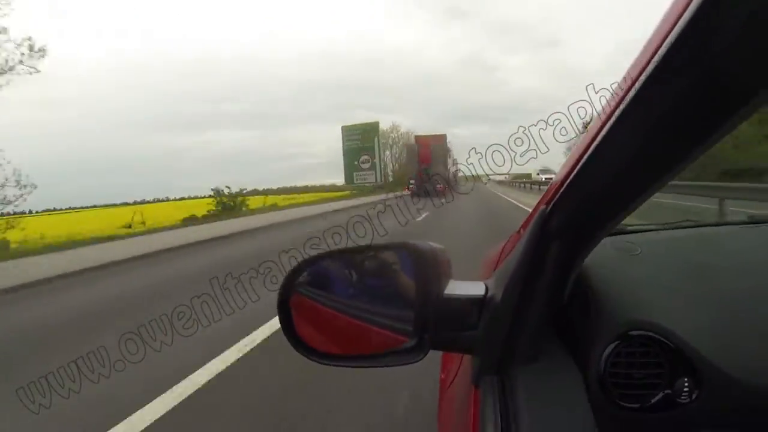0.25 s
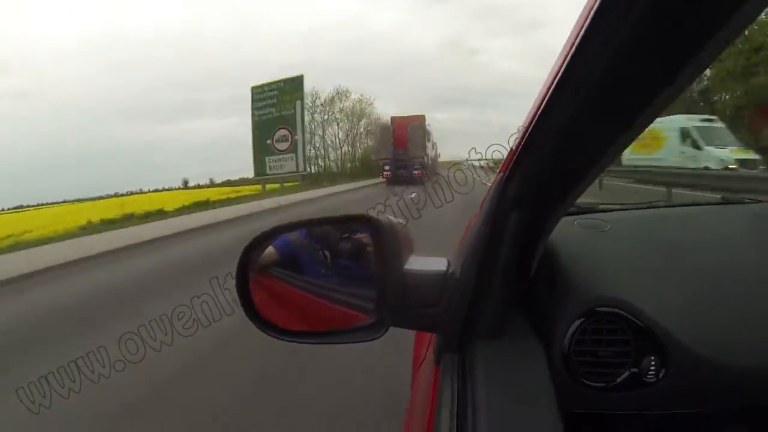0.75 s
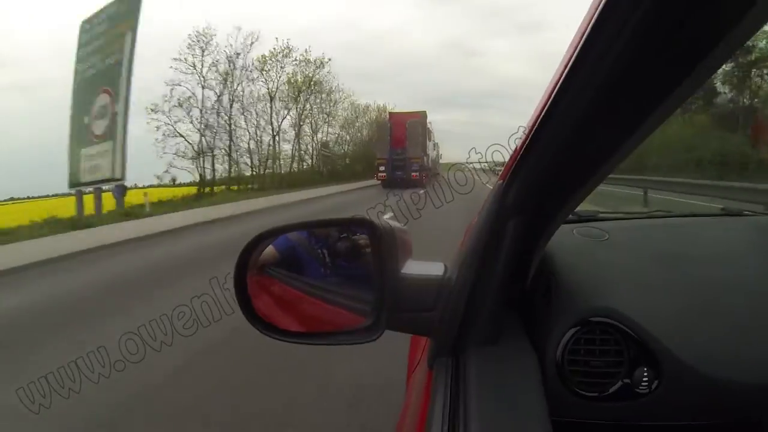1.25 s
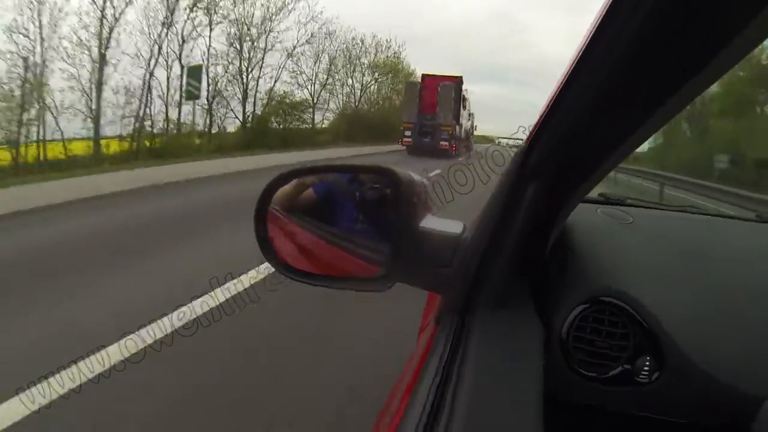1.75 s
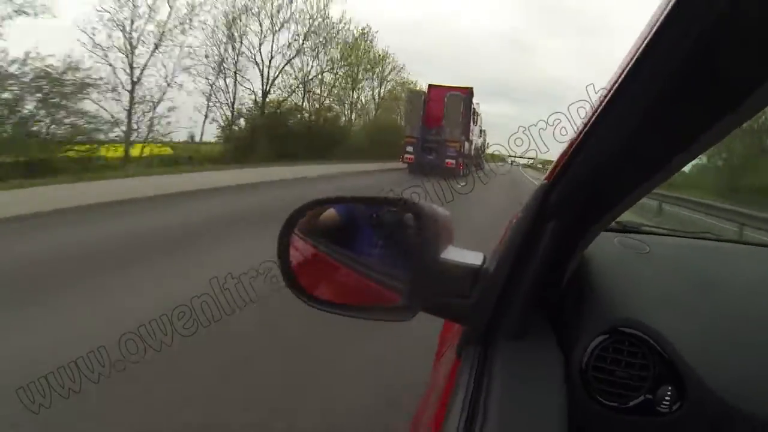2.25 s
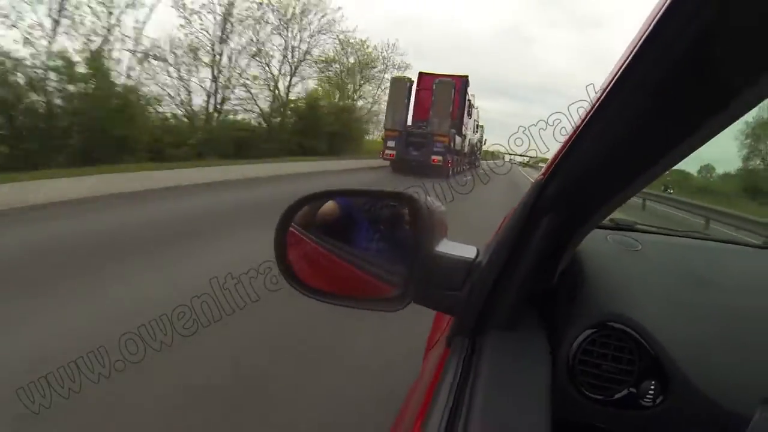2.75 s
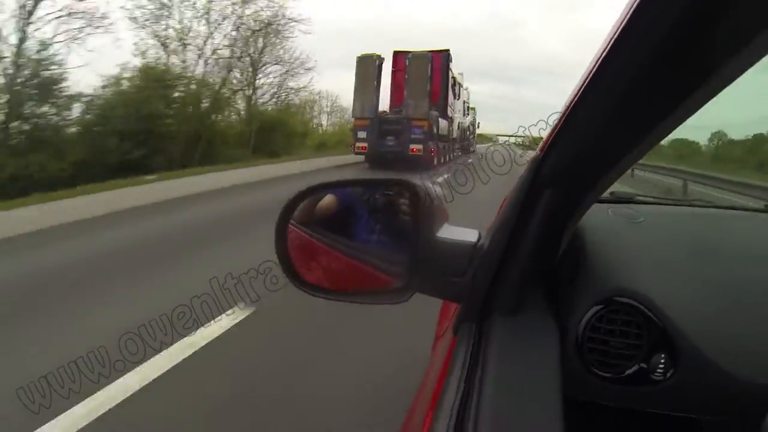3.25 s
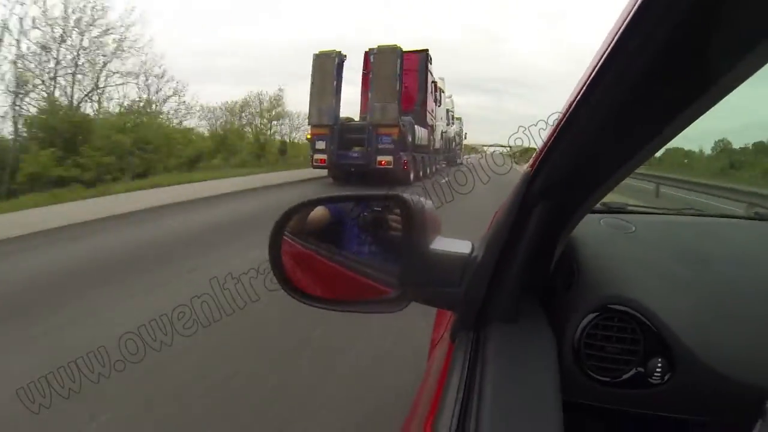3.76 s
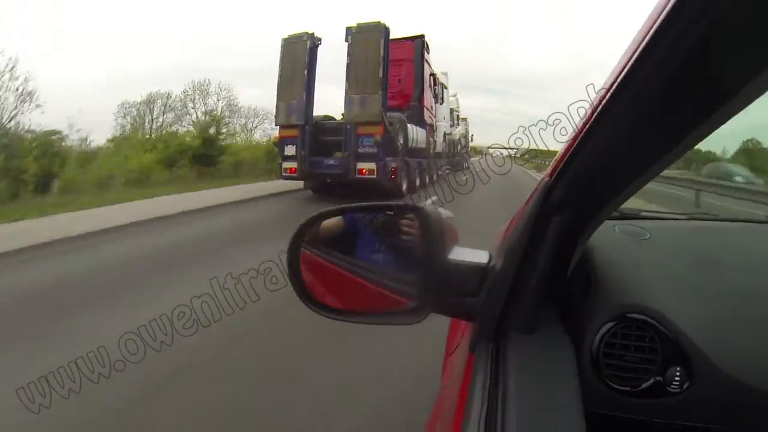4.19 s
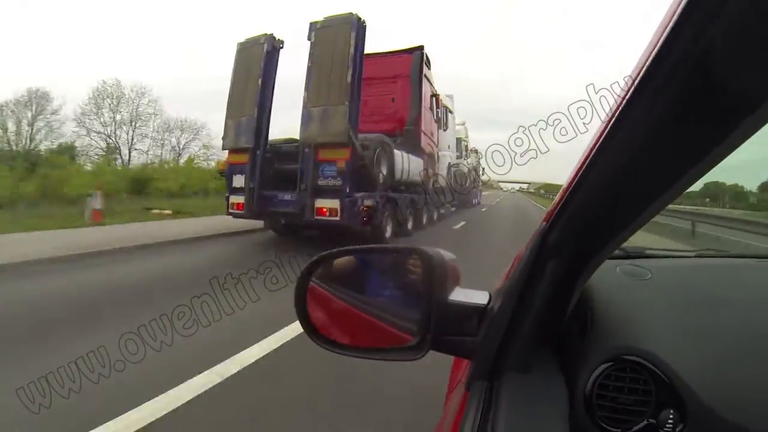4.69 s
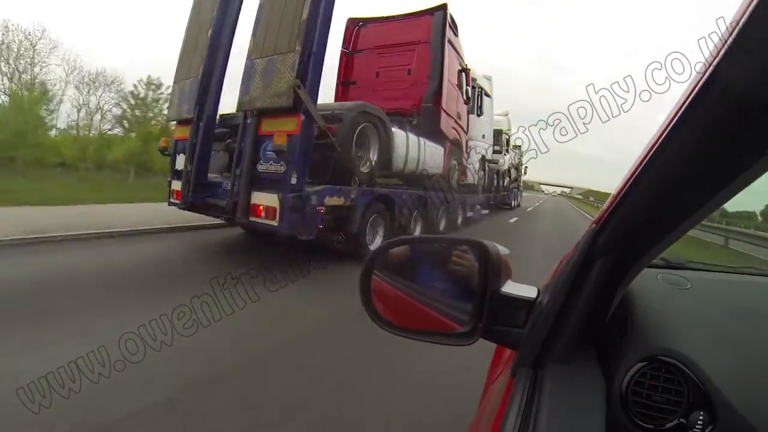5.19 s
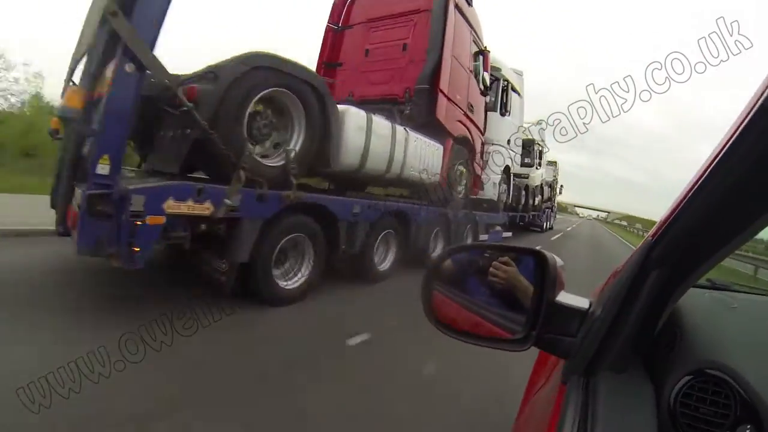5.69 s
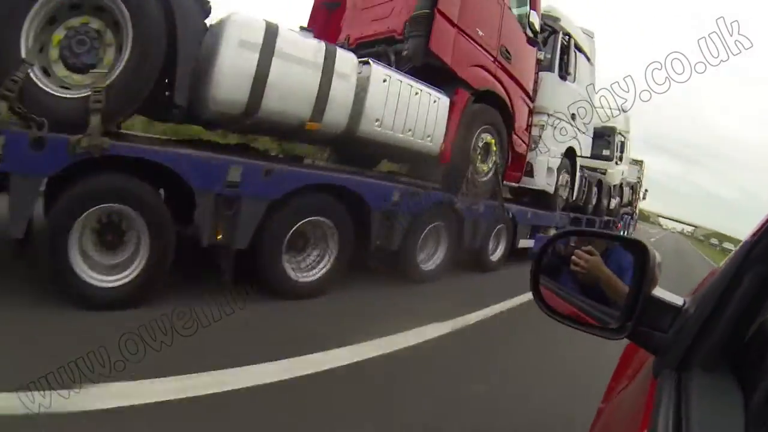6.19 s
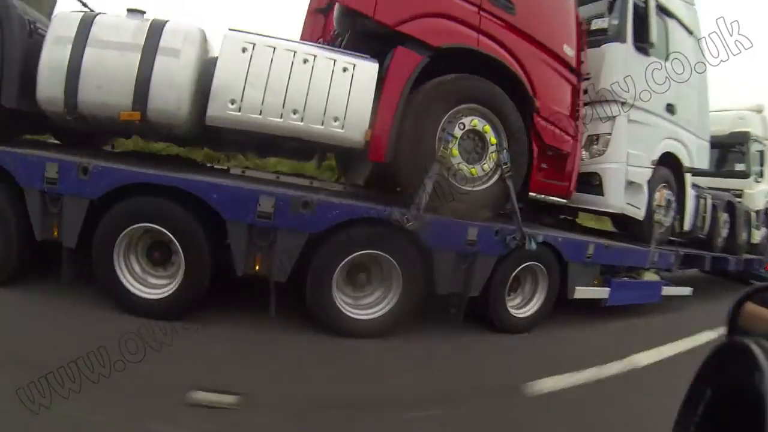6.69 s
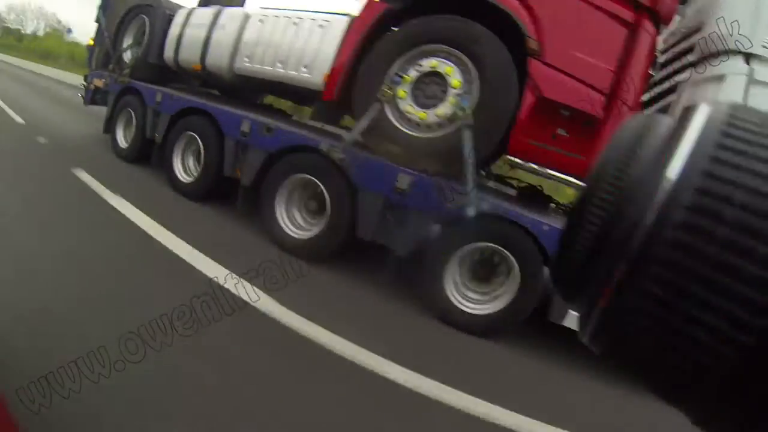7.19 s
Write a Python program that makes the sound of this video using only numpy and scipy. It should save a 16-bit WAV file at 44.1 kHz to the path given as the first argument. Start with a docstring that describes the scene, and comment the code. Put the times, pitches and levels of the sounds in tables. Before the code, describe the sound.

Wind noise dominates from the start: dull thumps, short ripping bursts and fluttering air overload a small microphone at a moving car's window. Steady road and tyre roar sits far below, dipping after strong gusts. Gusts come in uneven clusters, crowd together near the lorry's rear, then merge into a thick turbulent rush beside its wheels before it slackens slightly at the end.

```python
"""Heard: low lumpy rumble, ragged flutter, gusts that thump and tear, a surge beside a lorry, tyre roar below.
A small camera sits at the open window of a car on a fast road, passing the lorry.
Gusts, flutter and wake are shaped membrane flips; thumps are damped swings; rumble and tyres are shaped noise.
Rumble and tyres sink after each strong gust and climb back; the whole is limited and softly overloaded."""
import sys
import numpy as np
from scipy import signal
from scipy.fft import rfft, irfft
from scipy.io import wavfile
from scipy.ndimage import uniform_filter1d

SR = 44100
rng = np.random.default_rng(int(sys.argv[2]) if len(sys.argv) > 2 else 0)


def bounce(signal):
    """Save signal as a 16-bit WAV file at the path given by the first command-line argument."""
    frames = np.transpose(np.atleast_2d(signal))
    limited = np.clip(frames, -1, 1)
    pcm = np.round(limited * 32767).astype(np.int16)
    wavfile.write(sys.argv[1], SR, pcm)


N = 328104

# Gusts on the port. Each row: middle of the rise in seconds, tearing level in dB, thump level in dB,
# nominal length in seconds.
GUSTS = [(0.0097, -32, -28, 0.024), (0.041, -24.5, -16, 0.026), (0.073, -22.5, -31, 0.005),
         (0.108, -26, -9.5, 0.014), (0.168, -43, -16, 0.0053), (0.2264, -23, -6, 0.0086),
         (0.239, -22.5, -21.5, 0.018), (0.274, -30, -17, 0.025), (0.355, -57, -19, 0.02),
         (0.3817, -33.5, -10, 0.014), (0.408, -37, -16, .015), (0.443, -24, -1.5, 0.012),
         (0.462, -26, -14, .006), (0.476, -26, -6.5, 0.0075), (0.566, -62, -11, 0.012),
         (0.66, -56, -6, 0.0057), (0.705, -27, 0.5, 0.016), (0.7456, -38, -11, 0.008),
         (0.7617, -31.5, -14, 0.025), (0.794, -20, -0.5, 0.0095), (0.92, -33, -7, 0.015),
         (0.956, -29.5, -13.5, .009), (1.0535, -30.5, -3, 0.009), (1.089, -41.5, -14, 0.015),
         (1.165, -33.5, -18, 0.011), (1.197, -31, -35, 0.0098), (1.235, -32, -34, 0.012),
         (1.2602, -21, -24, 0.013), (1.3414, -38.5, -8.5, 0.0064), (1.36, -37.5, -20, 0.014),
         (1.463, -21.5, -1.5, 0.005), (1.5029, -28.5, -13, 0.0043), (1.715, -37, -2, 0.0064),
         (1.928, -37, -9, 0.011), (2.0457, -26.5, -10, 0.015), (2.1, -11.5, -3, 0.005),
         (2.1419, -28, -26, 0.015), (2.2122, -13, -9.5, .013), (2.232, -29, -13, 0.0074),
         (2.2572, -21.5, -22, 0.0051), (2.321, -31.5, -9, 0.0062), (2.3536, -25.5, -2.5, 0.0093),
         (2.3958, -30.5, -22, 0.0094), (2.537, -35, -2, 0.015), (2.572, -18.5, -12, 0.0026),
         (2.6918, -33.5, -4.5, 0.0073), (2.737, -21, -7.5, 0.012), (2.7643, -19, -26, 0.0048),
         (2.8036, -26.5, -40, .013), (2.8273, -24, -19, 0.005), (2.865, -25, -3, .012),
         (2.919, -44.5, -16, 0.014), (3.102, -40, -12.5, 0.0054), (3.154, -43, -12, 0.006),
         (3.162, -24.5, -8, 0.024), (3.255, -15.5, -9, 0.0057), (3.262, -38, -18.5, 0.033),
         (3.348, -29, -13.5, 0.011), (3.419, -34.5, -2.5, 0.015), (3.48, -24.5, -11.5, 0.011),
         (3.619, -40, -9.5, 0.01), (3.85, -33, -8.5, 0.0041), (3.953, -44.5, -5.5, 0.016),
         (3.977, -23, -18, .011), (4.11, -43, -8, 0.019), (4.1296, -25, -21, .012),
         (4.1802, -36, -22, 0.032), (4.2173, -32.5, -22, .012), (4.25, -26, -7, 0.0058),
         (4.419, -38, 6.5, 0.0066), (4.428, -21.5, 3, 0.013), (4.4651, -26, -13, .017),
         (4.5312, -42.5, -21.5, 0.024), (4.649, -31, -5, 0.012), (4.691, -21.5, -9.5, 0.01),
         (4.723, -25.5, -13, .01), (4.8697, -40, -9, 0.012), (4.9425, -31.5, -15, 0.02),
         (5.222, -46, 6.5, 0.025), (5.2686, -36.5, -8, 0.0085), (5.3595, -32, -7.5, 0.021),
         (5.4075, -27.5, -4, .014), (5.47, -33, -20, 0.0073), (5.4822, -33, -20, .012),
         (5.499, -17, 0, 0.015), (5.526, -24, -4, .008), (5.556, -24, -6, 0.026),
         (5.5852, -20, -6.5, 0.017), (5.6242, -17, -9, 0.015), (5.707, -19, -5, 0.0033),
         (5.766, -24.5, -8, 0.0087), (5.8, -21, -3.5, 0.0089), (5.824, -33, -19, 0.0092),
         (5.8586, -17.5, 6.5, 0.016), (5.9, -26, -16, 0.0033), (5.914, -22.5, -14.5, 0.012),
         (5.967, -26, -13, 0.0063), (6.016, -25.5, -15, 0.013), (6.0363, -27, -10, 0.011),
         (6.07, -34, -10.5, 0.0059), (6.129, -30, -39, 0.0061), (6.262, -25, -33, 0.023),
         (6.3006, -23, 0.5, .011), (6.3424, -31, -18, 0.0051), (6.767, -42, -11.5, 0.045),
         (6.983, -33, -4, 0.053), (7.1632, -28, -9, 0.019), (7.206, -32, -10.5, 0.01),
         (7.3174, -32.5, -21.5, 0.059)]
# Spells of stronger airflow. Each row: start of full strength in seconds, its length in seconds, flow level in dB.
FLURRIES = [(0.0, 0.017, -16.5), (0.246, .2, -23), (0.674, 0.14, -22.5), (1.043, 0.077, -27.5),
            (1.2, 0.089, -23.5), (1.667, 0.083, -32.5), (2.244, 0.25, -26), (2.734, 0.14, -22),
            (3.08, 0.021, -30.5), (3.42, 0.16, -27), (3.752, 0.029, -36.5), (4.117, 0.36, -25.5),
            (4.687, 0.22, -28), (5.26, 0.052, -17), (5.503, 0.085, -12), (5.754, .12, -19),
            (6.005, 0.16, -16.5), (6.253, 0.1, -18.5), (6.508, .18, -17), (6.727, 0.18, -14),
            (7.002, 0.065, -13), (7.166, 0.19, -18.5)]
# Spectrum of one eddy on the port. Each row: frequency in Hz, relative density in dB per Hz.
EDDY_SPECTRUM = [(60, -37), (130, 13.5), (300, -3.5), (600, -13), (1500, -26), (4000, -43)]
# Spectrum of the tearing. Each row: frequency in Hz, relative density in dB per Hz.
TEAR_SPECTRUM = [(700, -5), (1500, -2), (2900, -4), (5000, -8.5), (8000, -20.5), (12000, -28.5),
                 (15000, -37)]
# Spectrum of the dense air beside the lorry's wheels. Each row: frequency in Hz, relative density in dB per Hz.
WAKE_SPECTRUM = [(70, -22), (130, 3.5), (300, -2), (700, -13.5), (1600, -28), (4000, -45.5)]
# Level of that air. Each row: time in seconds, level in dB.
WAKE_LEVEL = [(0, -68.5), (6.2, -53), (6.52, -18), (6.85, -18.5), (7.1, -24), (7.25, -31), (7.44, -25.5)]
# Spectrum of the slow pressure swings. Each row: frequency in Hz, relative density in dB per Hz.
RUMBLE_SPECTRUM = [(12, -44), (22, 0.5), (40, 2.5), (66, 0.5), (100, -4.5), (140, -38.5), (250, -29.5)]
# Rumble before it sinks after gusts. Each row: time in seconds, level in dB.
RUMBLE_LEVEL = [(0, -15), (0.6, -15.5), (1.05, -16), (1.3, -18), (1.5, -22), (1.9, -12), (2.0, -18),
                (2.3, -14.5), (3.1, -15.5), (3.65, -19), (4.05, -18), (4.25, -14), (5.12, -19.5),
                (5.3, -8.5), (5.9, -15.5), (6.35, -7), (6.55, -16), (7.1, -15), (7.44, -25)]
# Spectrum of the road roar. Each row: frequency in Hz, relative density in dB per Hz.
TYRE_SPECTRUM = [(100, 3), (250, -17), (600, -8), (800, -1), (950, -3), (1170, -2), (1500, -7.5),
                 (2500, -19), (5000, -31), (10000, -45.5), (15000, -52)]
# Roar before it sinks after gusts; the lorry draws alongside. Each row: time in seconds, level in dB.
TYRE_LEVEL = [(0, -38), (4.5, -42), (5.2, -39), (7.44, -36)]

RISE_S, FALL_DB_PER_S = 0.0046, 4300.0
BODY_DB, TEAR_SHARE = 5.5, 0.41  # a gust's dull body is set between its tearing and its thump
SNAP_SHARE, SNAP_SPEED_RATIO = 0.54, 3.14  # a quicker swing rides on the front of each thump
SWELL_DB_PER_S, EBB_DB_PER_S, LULL_DB = 161, 114.5, -42.5
MEAN_FLOW_DB = -23.5  # reference for the slopes below
FIZZ_DB, FIZZ_DB_PER_DB = -47.5, 1.72  # fizz rises faster than the airflow
QUICK_DB, QUICK_DB_PER_DB, QUICK_HZ = -9, 0.31, 260  # strong flow sheds quicker eddies
LUMP_CAP_SD = 2.1  # in standard deviations, before depth scaling
LUMP_DEPTH_SLOPE = -0.0099  # lump depth against flow dB; the cap keeps the flutter equally lumpy throughout
EDGE_HZ = 15400


def gain_of(db):
    """Amplitude factor of a level in dB."""
    return 10 ** (np.asarray(db) / 20)


def evened(x):
    """Scales x to rms 1."""
    return x / np.sqrt(np.mean(x ** 2) + 1e-20)


def coloured(x, spectrum):
    """Filters x by a spectrum, silent outside its span, to rms 1."""
    point_hz, point_db = np.transpose(spectrum)
    hz = np.fft.rfftfreq(N, 1 / SR)
    filter_db = np.interp(np.log(hz + 1), np.log(point_hz + 1), point_db, -90, -90)
    return evened(irfft(rfft(x) * gain_of(filter_db), N))


def wander(corner_hz):
    """Smooth noise of rms 1, its amplitude halved at corner_hz and falling above."""
    hz = np.fft.rfftfreq(N, 1 / SR)
    return evened(irfft(rfft(rng.standard_normal(N)) / (1 + (hz / corner_hz) ** 2), N))


def level_curve(rows):
    """Gain at every sample from rows of time and dB."""
    time_s, level_db = np.transpose(rows)
    return gain_of(np.interp(np.arange(N) / SR, time_s, level_db))


def highpass(x, corner_hz):
    """Second-order Butterworth low cut."""
    return signal.sosfilt(signal.butter(2, corner_hz, "high", fs=SR, output="sos"), x)


def peak_hold(level_db, recovery_db_per_s):
    """Follows rises at once and falls at a steady rate."""
    ramp_db = np.arange(N) * recovery_db_per_s / SR
    return np.maximum.accumulate(level_db + ramp_db) - ramp_db


def membrane_flips(corner_hz):
    """The membrane flips between two stops; weighting by frequency levels the spectrum of the steps."""
    travel = np.tanh(11.1 * wander(corner_hz))
    return irfft(rfft(travel) * np.fft.rfftfreq(N), N)


def torn(flips, level):
    """Tearing noise at a level; the stronger the air, the more top it has."""
    tear = coloured(flips, TEAR_SPECTRUM)
    top_gain = (level / gain_of(-43.5)) ** 0.17 - 1
    return level * (tear + highpass(tear, 5000) * top_gain)


def gust_shape(levels_db):
    """Quick rise, short hold and steep fall of every gust, each at its own level."""
    out = np.zeros(N + SR)
    t = np.arange(1500) / SR  # every gust is over by 34 ms
    rise = np.minimum(t / RISE_S, 1) ** 2
    for (mid_s, _, _, length_s), db in zip(GUSTS, levels_db):
        fall = gain_of(-np.maximum(t - 0.87 * length_s, 0) * FALL_DB_PER_S)
        at = round((mid_s - RISE_S / 2) * SR)
        out[at:at + len(t)] += gain_of(db) * rise * fall
    return out[:N]


def gusts():
    """Flips of the membrane heard as a dull body and a tearing top."""
    flips = membrane_flips(1000)
    _, tear_db, thump_db, _ = np.transpose(GUSTS)
    body_db = BODY_DB + TEAR_SHARE * tear_db + (1 - TEAR_SHARE) * thump_db
    body = coloured(flips, EDDY_SPECTRUM) * gust_shape(body_db)
    raggedness = evened(gain_of(5.1 * np.minimum(wander(320), 1.3)))
    return body + torn(flips, gust_shape(tear_db) * raggedness)


def thumps():
    """Each gust pushes the membrane in, and it swings back past rest."""
    out = np.zeros(N + SR)
    t = np.arange(2000) / SR
    for (mid_s, _, db, _), chance in zip(GUSTS, rng.random(len(GUSTS))):
        cycles = t * 75 * (1 + 0.57 * chance)  # 75 to 118 Hz
        swing = np.sin(2 * np.pi * cycles) * cycles ** 0.55 * np.exp(-2.2 * cycles)
        snap = np.sin(2 * np.pi * SNAP_SPEED_RATIO * cycles) * np.exp(-4.0 * cycles)
        thump = swing / abs(swing).max() + SNAP_SHARE * snap
        at = max(round((mid_s - .003) * SR), 0)
        out[at:at + len(t)] += gain_of(db) * thump
    return out[:N]


def airflow_db():
    """Each flurry swells, holds and ebbs at shared rates, over a lull."""
    t = np.arange(0, N, 100) / SR
    start_s, length_s, full_db = np.transpose(FLURRIES)[:, :, None]
    swell_db = SWELL_DB_PER_S * np.maximum(start_s - t, 0)
    ebb_db = EBB_DB_PER_S * np.maximum(t - start_s - length_s, 0)
    strongest_db = (full_db - swell_db - ebb_db).max(axis=0)
    return np.interp(np.arange(N) / SR, t, np.maximum(strongest_db, LULL_DB))


def flutter():
    """Many small eddies flip the membrane; the fizz comes in sharper lumps than the body."""
    flips = membrane_flips(375)
    flow_db = airflow_db()
    excess_db = flow_db - MEAN_FLOW_DB
    lump_depth = np.clip(1.5 + LUMP_DEPTH_SLOPE * excess_db, .3, 1.05)
    lumps = np.minimum(wander(102), LUMP_CAP_SD) * lump_depth
    eddies = coloured(flips, EDDY_SPECTRUM)
    eddies = eddies + highpass(eddies, QUICK_HZ) * gain_of(QUICK_DB + QUICK_DB_PER_DB * excess_db)
    body = eddies * evened(gain_of(8.1 * lumps)) * gain_of(flow_db)
    fine_lumps = np.minimum(wander(210), LUMP_CAP_SD)
    fizz_lumps = evened(gain_of(7.5 * lumps + 5.5 * fine_lumps))
    return body + torn(flips, fizz_lumps * gain_of(FIZZ_DB + FIZZ_DB_PER_DB * excess_db))


def wake():
    """Beside the lorry the eddies crowd into one continuous surge."""
    surge = coloured(membrane_flips(224), WAKE_SPECTRUM) * evened(gain_of(3.4 * wander(30)))
    return surge * level_curve(WAKE_LEVEL)


def rumble():
    """Slow pressure swings of the air spilling past the window, as lumpy low noise."""
    swing = coloured(rng.standard_normal(N), RUMBLE_SPECTRUM) * gain_of(0.98 * wander(57))
    return evened(swing) * level_curve(RUMBLE_LEVEL)


def tyres():
    """Broad road roar with a hump near 1 kHz, as unsteady noise."""
    roar = coloured(rng.standard_normal(N), TYRE_SPECTRUM) * gain_of(2.9 * wander(21))
    return roar * level_curve(TYRE_LEVEL)


def after_gust_db():
    """Control for the sinking background: jumps with a strong gust, returns at a steady pace."""
    thump_db = np.transpose(GUSTS)[2]
    gust_db = 20 * np.log10(gust_shape(thump_db) + 1e-6)
    over_db = np.maximum(peak_hold(gust_db, 131.5) + 29.0, 0)  # gusts above -29 dB count
    return uniform_filter1d(over_db, 300)


def scene():
    """Air sounds share the membrane's limited travel; thumps and tyres are added after it."""
    sunk_db = after_gust_db()
    wind = gusts() + flutter() + wake() + rumble() * gain_of(-.4 * sunk_db)
    wind = 0.52 * np.tanh(wind / 0.54)  # limited travel flattens the big swings
    return (wind + thumps() + tyres() * gain_of(-.8 * sunk_db))[None]


def record(dry):
    """Low cut, a quick limiter on the loud swings, soft overload, then the band limit."""
    cut = highpass(dry, 16)
    peak_db = 20 * np.log10(abs(cut[0]) + 1e-6)
    over_db = np.maximum(peak_hold(peak_db, 540.0) + 11.0, 0)  # acts above -11 dB
    lag = np.exp(-1 / (0.0015 * SR))  # 1.5 ms to act, so first peaks slip through
    reduction_db = .9 * signal.lfilter([1 - lag], [1, -lag], over_db)
    held = cut / gain_of(reduction_db)
    squashed = 1.183 * np.tanh(held / 0.8)
    band_limit = signal.firwin(511, EDGE_HZ, window=("kaiser", 9), fs=SR)
    return signal.oaconvolve(squashed, band_limit[None], "same")


dry = scene()
out = record(dry)
bounce(out)
```